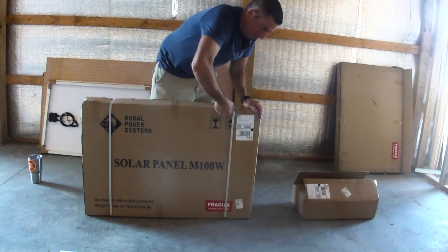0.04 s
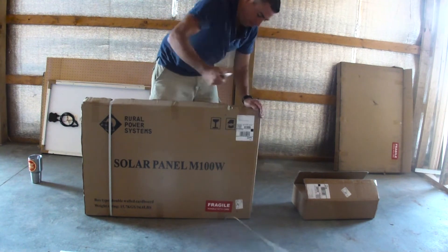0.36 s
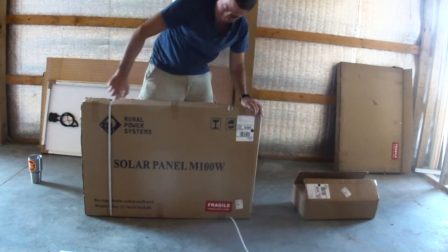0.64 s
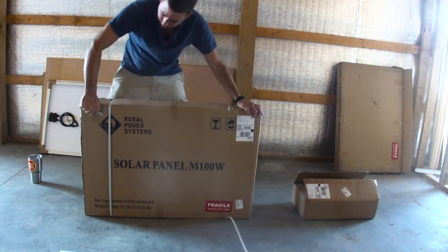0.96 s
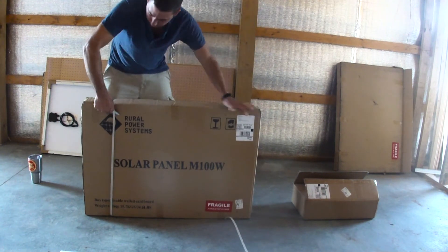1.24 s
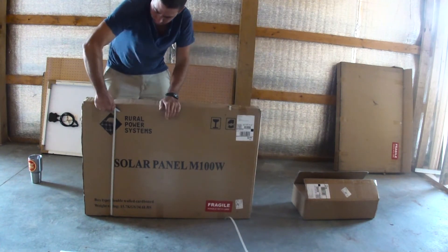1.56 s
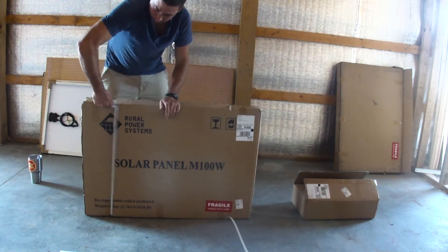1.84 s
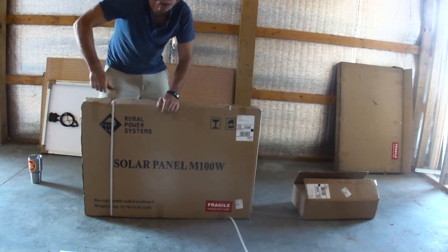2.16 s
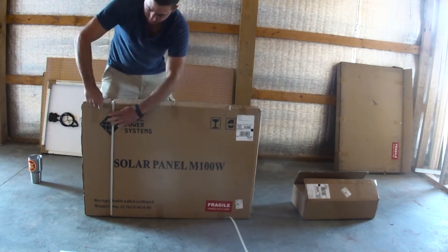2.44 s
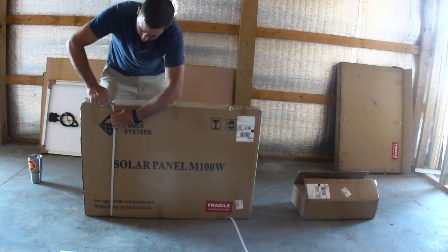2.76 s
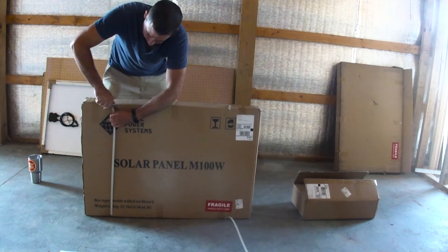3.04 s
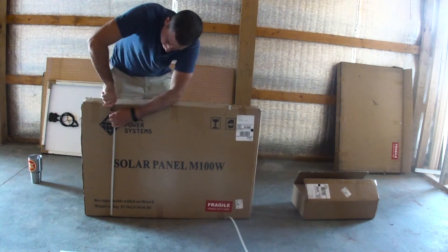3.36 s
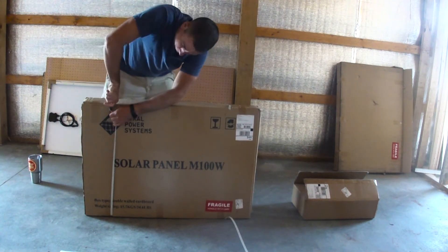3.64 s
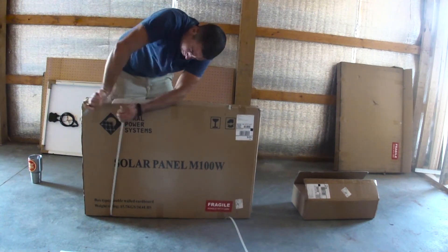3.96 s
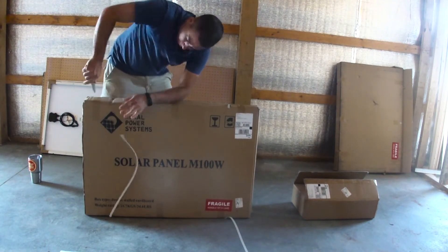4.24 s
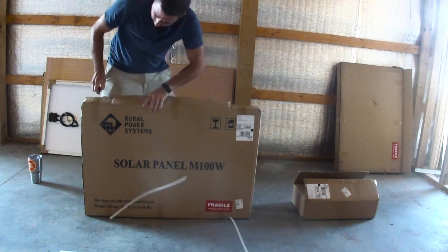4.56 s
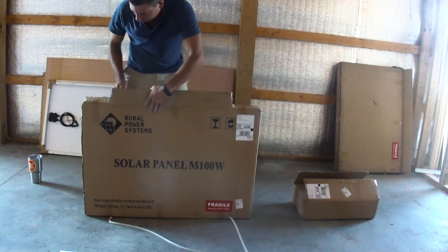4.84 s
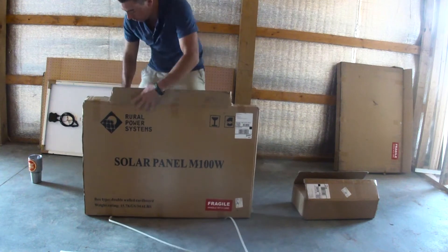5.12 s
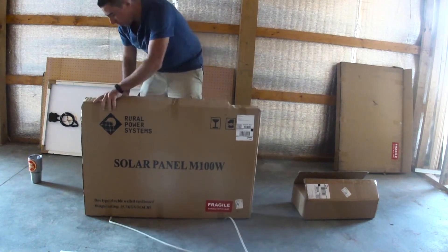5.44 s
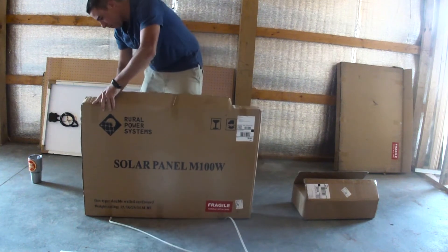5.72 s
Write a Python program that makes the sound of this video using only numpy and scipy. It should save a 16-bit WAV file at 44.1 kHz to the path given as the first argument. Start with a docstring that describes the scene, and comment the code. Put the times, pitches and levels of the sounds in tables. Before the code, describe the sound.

At about 0.2 seconds a plastic strap lets go with a very loud crack, slapping and rattling a large hollow cardboard box. Its loose end ticks against box and floor twice by 0.5 seconds. From 0.7 to 1.5 seconds hands and fingers knock softly and slide on the board. A sharp double snap comes near 1.9 seconds, then faint rubbing and a soft bump around 2.5. A light tick at 3.7 leads to another strap snapping off with a short rasp at 4 seconds, and a flick at 4.5. Several quick knocks and a scrape follow, and a flap pops up at 4.8. Hands brush the cardboard until a crisp click at 5.7 seconds. The sounds are close, each blow ringing briefly in a bare shed with a concrete floor. Underneath run a quiet, steady outdoor rush and a faint, wavering, distant whine.

```python
"""A bare shed with a concrete floor, two microphones close to a big cardboard box.
Plastic packing straps are peeled open and snapped off: each release cracks and slaps the hollow box,
and the loose strap ticks against box and floor. Hands knock and slide on the board, then a flap is
pulled up. The walls echo and ring; from outside come a steady rush and a faint, far whine."""
import sys
import numpy as np
from scipy import signal
from scipy.fft import rfft, irfft
from scipy.io import wavfile

SR = 44100
rng = np.random.default_rng(int(sys.argv[2]) if len(sys.argv) > 2 else 0)


def generate_wav(sig):
    """Save sig (samples, or channels by samples) to the path in sys.argv[1] as 16-bit PCM at SR."""
    pcm = np.round(np.clip(np.atleast_2d(sig).T, -1, 1) * 32767).astype(np.int16)
    wavfile.write(sys.argv[1], SR, pcm)


N = 259879
TIME = np.arange(N) / SR

# spectrum of the whole carton's rattle: frequency_hz, level_db
RATTLE_SPECTRUM = [(60, -10), (170, -12.5), (330, 3.5), (500, 1.5), (850, 4.5), (1400, -2.5), (2300, -4.5),
                   (3500, -3), (5500, -12), (10000, -23)]


def from_db(db):
    return 10 ** (np.asarray(db) / 20)


def unit_rms(x):
    return x / np.sqrt(np.mean(x ** 2) + 1e-20)


def at_hz(points, hz):
    """Reads a table along a log-frequency axis."""
    at, value = np.transpose(points)
    return np.interp(np.log(np.maximum(hz, 1)), np.log(at), value)


def colour(x, spectrum):
    """Minimum-phase filter that follows rows of frequency_hz, gain_db."""
    size = 4096
    gain = from_db(at_hz(spectrum, np.fft.rfftfreq(size, 1 / SR)))
    cepstrum = irfft(np.log(gain))
    cepstrum[1:size // 2] *= 2
    cepstrum[size // 2 + 1:] = 0
    response = irfft(np.exp(rfft(cepstrum)))
    response = response.reshape((1,) * (x.ndim - 1) + (-1,))
    return signal.oaconvolve(x, response, axes=-1)[..., :x.shape[-1]]


def drift(turns_per_s):
    """A random wander between points of spread 1."""
    knots = rng.standard_normal(N // 16)
    return np.interp(TIME * turns_per_s, np.arange(len(knots)), knots)


def add(track, start_s, sound):
    """Lays a sound into a track."""
    at = max(0, round(start_s * SR))
    track[at:at + len(sound)] += sound[:max(0, N - at)]


def diffuse_noise(size):
    """Noise from all around: alike at both microphones in the low mids, wide in the treble."""
    # stereo width: frequency_hz, side_against_mid_db
    width = [(60, -7), (130, -12), (280, -24), (550, -22), (1000, -16), (2000, -13), (5000, -5),
             (14000, -2)]
    mid, side = rng.standard_normal((2, size))
    return mid + colour(side, width) * np.array([[1], [-1]])


def outdoor_rush(waver_db=0.4):
    """A steady outdoor rush; the background dips after the first loud snap and then wavers."""
    # colour of the rush: frequency_hz, level_db
    spectrum = [(25, -70), (55, -11), (110, -10), (230, -2), (400, 2.5), (600, 3), (850, 0), (1200, -4),
                (2200, -11.5), (4000, -16), (7000, -16.5), (16000, -34.5)]
    # its level as heard: time_s, level_db
    levels = [(0, -42), (0.6, -51), (1.0, -44.5), (1.8, -47), (3.7, -49), (4.45, -47.5), (5.1, -44.5),
              (5.89, -45.5)]
    level_db = np.interp(TIME, *np.transpose(levels)) + waver_db * drift(3.19)
    return from_db(level_db) * unit_rms(colour(diffuse_noise(N), spectrum))


def far_whine(rest_hz=839.6, rest_db=-59.5, db_per_hz=0.2024, waver_hz=4.15, flutter_db=1.8):
    """A thin, wavering tone like that of a far machine, louder as its pitch rises."""
    # course of the whine: time_s, pitch_hz
    glide = [(0.1, 864), (0.4, 810), (2.48, 815), (2.64, 876.4), (3.02, 870), (3.12, 841), (4.3, 812),
             (5.5, 845)]
    pitch_hz = np.interp(TIME, *np.transpose(glide))
    phase = 2 * np.pi * np.cumsum(pitch_hz + waver_hz * drift(39.6)) / SR
    level_db = rest_db + db_per_hz * (pitch_hz - rest_hz) + flutter_db * drift(20.9)
    return np.sqrt(2) * np.sin(phase) * from_db(level_db)


def standing_waves(x, t60_s=0.091):
    """A few standing waves between the walls ring on after each blow."""
    # modes of the shed: pitch_hz
    modes = [451, 475, 671, 931, 1075, 1220, 1516, 1649, 1828, 1929, 2345]
    width_hz = np.log(1000) / (np.pi * t60_s)
    return sum(signal.lfilter(*signal.iirpeak(hz, hz / width_hz, fs=SR), x) for hz in modes)


def wall_echoes(x, gap_s=0.005, build_s=0.009):
    """Wall echoes thicken and die away above 140 Hz; the lowest band swells faintly a second later."""
    # time to fall 60 dB, or to grow by as much where negative: frequency_hz, t60_s
    tail_times = [(100, -0.4), (250, 0.79), (500, 0.66), (1000, 0.53), (2000, 0.65), (6000, 0.57),
                  (10000, 0.44), (16000, 0.4)]
    # colour of the shed's echoes: frequency_hz, level_db
    spectrum = [(100, 0.5), (250, 6), (500, 9), (1000, 2), (2000, 2.5), (4000, -1.5), (8000, 0.5),
                (16000, -7.5)]
    t = TIME[:SR]
    noise, hz = rfft(diffuse_noise(SR)), np.fft.rfftfreq(SR, 1 / SR)
    edges_hz = np.r_[0, np.geomspace(140, 14000, 21), SR]
    onset = 1 - np.exp(-(np.maximum(t - gap_s, 0) / build_s) ** 2)
    response = 0
    for low, high in zip(edges_hz, edges_hz[1:]):
        centre_hz = min(high, np.sqrt(max(low, 1) * high))
        band = (hz >= low) & (hz < high)
        tail = irfft(noise * band, SR) * onset * from_db(-60 * t / at_hz(tail_times, centre_hz))
        tail *= np.sqrt(2 * band.mean() / np.sum(tail ** 2))  # unity gain within the band
        response = response + tail * from_db(at_hz(spectrum, centre_hz))
    return signal.fftconvolve(x[None], response, axes=1)[:, :N]


def friction(spectrum, slips_per_s, grain_db, smooth_rub):
    """Tiny slips of uneven size over a smooth rub."""
    slips = (rng.random(N) < slips_per_s / SR) * rng.choice([-1, 1], N)
    sizes = from_db(grain_db * np.minimum(rng.exponential(1, N), 4))
    rub = unit_rms(slips * sizes) + smooth_rub * rng.standard_normal(N)
    return unit_rms(colour(rub, spectrum))


def slides(judder_db=2.5, rasp_gain_db=-1, hiss_gain_db=2, swell_share=0.17, fade_share=0.34):
    """Strap, hands and flap slide or tear along the board; the pressure judders over its flutes."""
    # strokes, levels ahead of the gains: start_s, length_s, rasp_db, hiss_db
    strokes = [(0.0, 0.024, -49, -45), (0.146, 0.16, -43, -48), (0.181, 0.006, -12, -28.5),
               (0.661, 0.046, -44, -50.5), (0.982, .1, -49.5, -50.5), (1.112, 0.19, -44, -56),
               (1.44, 0.078, -57, -50.5), (2.259, 0.14, -56, -51), (2.472, 0.19, -57, -49),
               (3.736, 0.057, -47, -54), (3.951, .038, -25.5, -31.5), (4.466, 0.057, -45.5, -46.5),
               (4.623, 0.067, -47, -48.5), (4.683, 0.099, -44, -42), (4.769, 0.023, -30, -22),
               (5.175, .11, -39.5, -54), (5.315, 0.17, -63, -50.5), (5.692, 0.042, -38, -49)]
    # resting hands brush the board faintly: start_s, end_s
    brushes = [(0.72, 1.45), (4.5, 5.65)]
    # the cardboard's rasp: frequency_hz, level_db
    rasp_spectrum = [(60, -29), (170, -4.5), (330, -5.5), (550, -4), (850, 0.5), (1500, 3.5), (2300, -2),
                     (4000, -6.5), (9000, -22)]
    # the strap's hiss: frequency_hz, level_db
    hiss_spectrum = [(800, -42), (2500, -3.5), (4000, -5), (6500, 5.5), (9000, -2.5), (12000, -9),
                     (16000, -5)]
    faint_strokes = [(start_s, end_s - start_s, -64.5, -57) for start_s, end_s in brushes]
    rasp, hiss = np.zeros((2, N))
    for start_s, length_s, rasp_db, hiss_db in strokes + faint_strokes:
        along = np.linspace(0, 1, max(8, int(length_s * SR)))
        pressure = np.clip(np.minimum(along / swell_share, (1 - along) / fade_share), 0, 1)
        add(rasp, start_s, from_db(rasp_db + rasp_gain_db) * pressure)
        add(hiss, start_s, from_db(hiss_db + hiss_gain_db) * pressure)
    rasp *= friction(rasp_spectrum, slips_per_s=2500, grain_db=2.0, smooth_rub=0.86)
    hiss *= friction(hiss_spectrum, slips_per_s=3400, grain_db=6.5, smooth_rub=1.2)
    return (rasp + hiss) * from_db(judder_db * drift(130))


def flex(hz, t60_s, rise_s):
    """Cardboard is pushed in and swings out in a few cycles."""
    t = TIME[:SR // 8]
    return np.sin(2 * np.pi * hz * t) * from_db(-60 * t / t60_s) * (1 - np.exp(-t / rise_s))


def click(spectrum):
    """One clean click of the given colour, with unit energy."""
    pulse = colour(signal.unit_impulse(SR // 16), spectrum)
    return pulse / np.sqrt(np.sum(pulse ** 2))


def fingers(count=4, start_s=1.013, gap_s=0.0152, thump_db=-21.5, pitch_hz=613, slap_db=-32.5):
    """Rows of knocks: fingers land in turn on the top edge, each spot with a pitch of its own."""
    pitches_hz = pitch_hz * np.exp(0.16 * rng.uniform(-1, 1, count))
    return [(start_s + k * gap_s, thump_db, hz, slap_db) for k, hz in enumerate(pitches_hz)]


def knocks(thump_gain_db=2, slap_gain_db=6, rattle_gain_db=14, rise_s=0.0013):
    """Hands bump the box softly: the face thumps, the edge slaps and the carton rattles."""
    # bumps, levels ahead of the gains: start_s, thump_db, thump_hz, slap_db
    bumps = [(0.131, -31, 336, -27), (0.667, -19.5, 525, -19), (0.949, -28.5, 590, -27),
             (1.129, -27, 487, -21.5), (1.49, -28, 397, -41), (2.56, -25.5, 602, -41),
             (3.369, -34.5, 610, -47), (4.593, -33.5, 727, -23.5), (4.638, -27, 417, -24.5),
             (4.697, -20.5, 457, -30), (4.731, -25.5, 400, -33)]
    face, edge, no_cracks, around = np.zeros((4, N))
    for start_s, thump_db, thump_hz, slap_db in bumps + fingers():
        add(face, start_s, from_db(thump_db + thump_gain_db) * flex(thump_hz, 0.024, rise_s))
        add(edge, start_s, from_db(slap_db + slap_gain_db) * flex(1150, 0.002, rise_s))
        add(around, start_s, from_db(slap_db + rattle_gain_db) * click(RATTLE_SPECTRUM))
    return np.array([face, edge, no_cracks, around])


def plastic_crack(spectrum, t60_s=0.005):
    """A dying cluster of tiny fractures, with unit energy."""
    t = TIME[:SR // 16]
    cluster = colour(rng.standard_normal(len(t)) * from_db(-60 * t / t60_s), spectrum)
    return cluster / np.sqrt(np.sum(cluster ** 2))


def flicks(thump_gain_db=-11, rattle_gain_db=-25, thump_hz=540, thump_t60_s=0.021):
    """Rows of light snaps: loose strap and flap flick box and floor, barely moving the carton."""
    # ticks: start_s, slap_db, slap_hz, crack_db, crack_hz
    ticks = [(0.2590, -9, 1770, -29, 6000), (0.4581, -20, 2130, -16, 8900), (3.7407, -18.5, 970, -42, 6880),
             (4.4790, -23.5, 1787, -39, 6000), (4.6966, -25, 1510, -29, 7500),
             (5.7036, -15, 1850, -11, 4720)]
    return [(start_s, slap_db, slap_hz, slap_db + thump_gain_db, thump_hz, thump_t60_s,
             crack_db, crack_hz, slap_db + rattle_gain_db)
            for start_s, slap_db, slap_hz, crack_db, crack_hz in ticks]


def snaps(slap_t60_s=0.0066, rise_s=0.0006, crack_gain_db=13, direct_crack_db=-1):
    """A strap lets go or the flap pops: it cracks, slaps the edge, thumps the face, rattles the box."""
    # each release lands twice, one row a landing, levels ahead of the gains:
    # start_s, slap_db, slap_hz, thump_db, thump_hz, thump_t60_s, crack_db, crack_hz, rattle_db
    landings = [(0.1852, 3.5, 1458, -1, 810, 0.0082, -14, 4570, 12),
                (0.1868, 8, 1016, 0.5, 558, 0.012, -22, 7000, -3),
                (1.9211, -0.5, 1190, -.5, 506, 0.021, -5, 5240, 12),
                (1.958, -1, 1340, -18, 412, 0.038, -7, 4070, -0.5),
                (3.9612, -0.5, 1125, -6, 713, 0.022, -26, 6540, -33),
                (3.9659, -4, 1130, -6.5, 514, 0.011, -17.5, 6600, 5),
                (4.7732, -4, 1600, -17, 864, 0.044, -19, 6250, -5.5),
                (4.7790, -13, 1520, -8, 492, 0.013, -11, 6500, -20)]
    face, edge, cracks, around = np.zeros((4, N))
    for (start_s, slap_db, slap_hz, thump_db, thump_hz, thump_t60_s,
         crack_db, crack_hz, rattle_db) in landings + flicks():
        # spectrum of the crack: frequency_hz, level_db
        plastic = [(crack_hz / 8, -21), (crack_hz / 2, -7), (crack_hz, 0), (crack_hz * 3, -21)]
        crack_level = from_db(crack_db + crack_gain_db)
        add(face, start_s, from_db(thump_db) * flex(thump_hz, thump_t60_s, rise_s))
        add(edge, start_s, from_db(slap_db) * flex(slap_hz, slap_t60_s, rise_s))
        add(cracks, start_s, crack_level * from_db(direct_crack_db) * plastic_crack(plastic))
        # summed over all directions the fractures even out to a smooth spectrum
        add(around, start_s, crack_level * click(plastic) + from_db(rattle_db) * click(RATTLE_SPECTRUM))
    return np.array([face, edge, cracks, around])


def scene(echo_db=-2, face_to_room_db=-7, edge_to_room_db=-4, baffle_hz=220, lead_samples=0.45):
    """Face and edge beam at the microphones; the rattle of back and sides arrives by way of the walls."""
    # air slips round the box, so its slowest motion radiates little
    baffle = signal.butter(2, baffle_hz, "high", fs=SR, output="sos")
    face, edge, cracks, around = signal.sosfilt(baffle, snaps() + knocks() + 1e-18)
    rub = signal.sosfilt(baffle, slides() + 1e-18)
    direct = face + edge + cracks + rub
    # the left microphone is a little nearer
    direct = direct + lead_samples * np.gradient(direct) * np.array([[1], [-1]])
    face_spill, edge_spill = from_db(face_to_room_db) * face, from_db(edge_to_room_db) * edge
    # each part of the box reaches the walls along paths of its own
    echoes = wall_echoes(face_spill + rub) + wall_echoes(edge_spill) + wall_echoes(around)
    ring = standing_waves(around + face_spill)
    return direct + from_db(echo_db) * echoes + ring + outdoor_rush() + far_whine()


def record(dry, clip_level=0.95, low_cut_hz=70, high_cut_hz=16000):
    """A filter dulls 3-5 kHz, cuts three narrow notches and leaves a gap near 12 kHz."""
    # filter curve: frequency_hz, gain_db
    filter_curve = [(30, -10), (150, 1.5), (2300, 2.5), (2750, -10.5), (3300, -15), (4900, -17), (5600, -5),
                    (10000, -0.5), (11200, -10), (12200, -41), (13800, -18), (15500, -5)]
    # notches of the filter: centre_hz, width_hz
    notches = [(3010, 200), (4000, 170), (5000, 200)]
    out = colour(dry, filter_curve)
    for centre_hz, width_hz in notches:
        out = signal.lfilter(*signal.iirnotch(centre_hz, centre_hz / width_hz, fs=SR), out)
    # the loudest snap clips, then bass and top are cut
    out = np.clip(out, -clip_level, clip_level)
    out = signal.lfilter(*signal.butter(1, low_cut_hz, "high", fs=SR), out)
    return signal.sosfilt(signal.ellip(10, 0.1, 80, high_cut_hz, fs=SR, output="sos"), out)


dry = scene()
out = record(dry)
generate_wav(out)
```